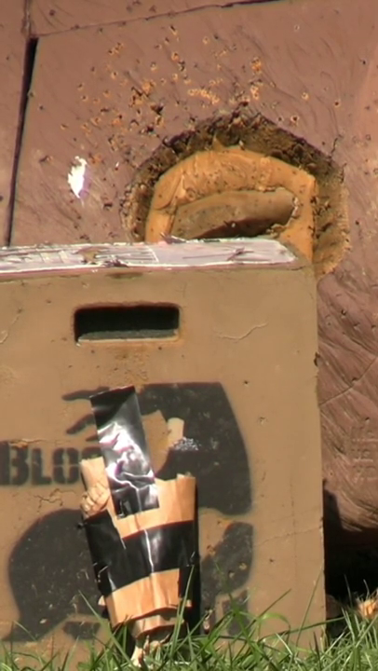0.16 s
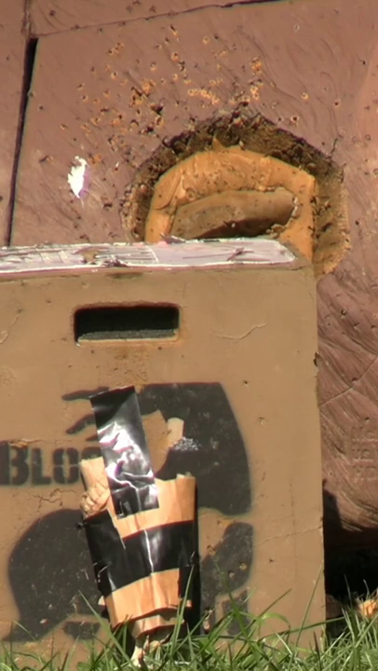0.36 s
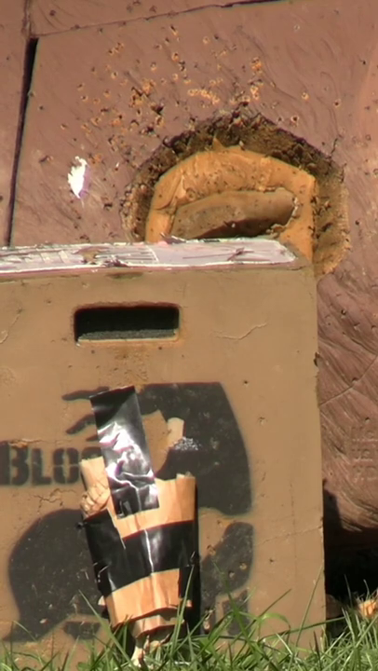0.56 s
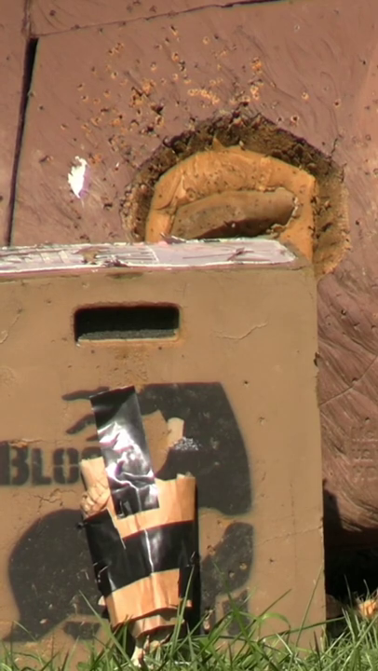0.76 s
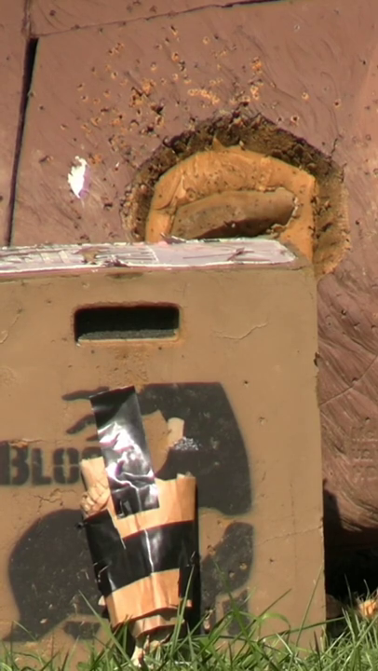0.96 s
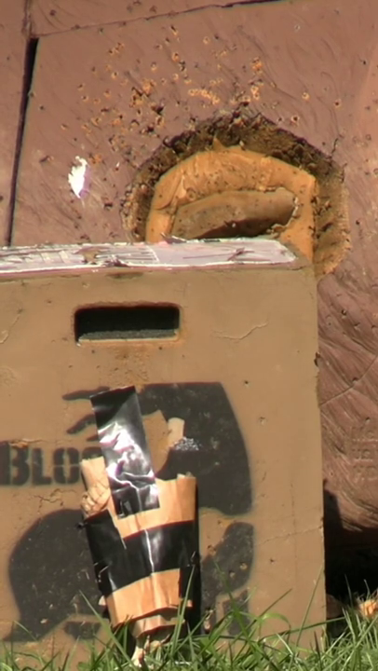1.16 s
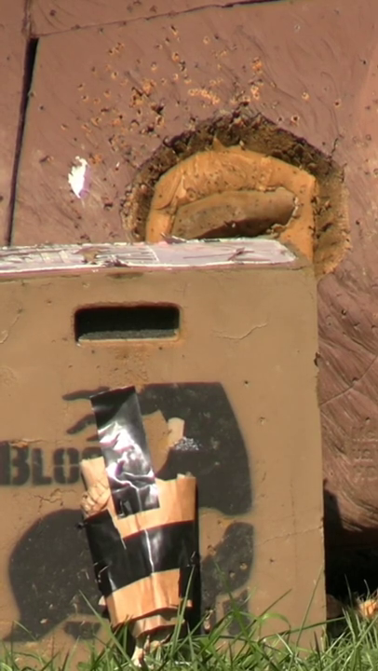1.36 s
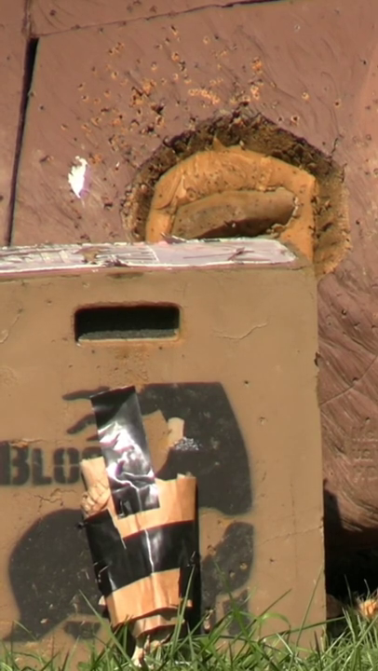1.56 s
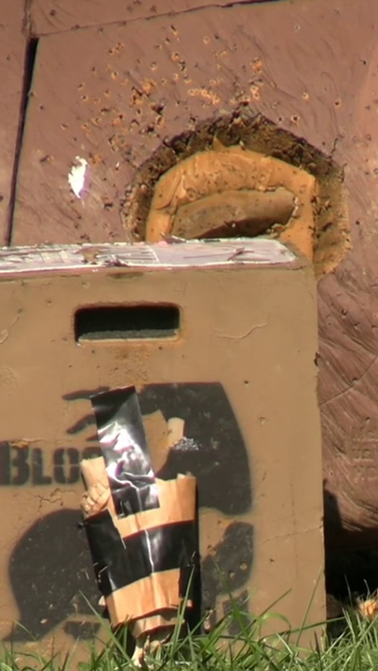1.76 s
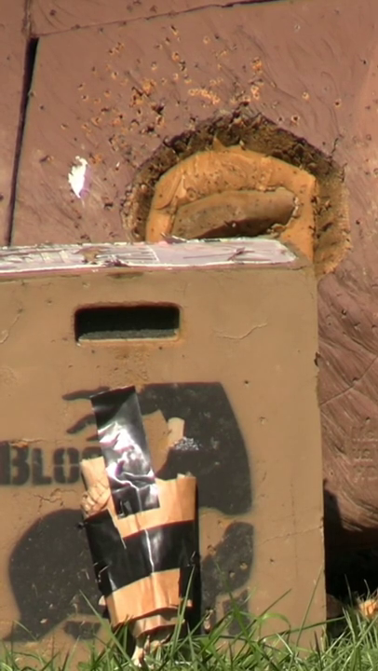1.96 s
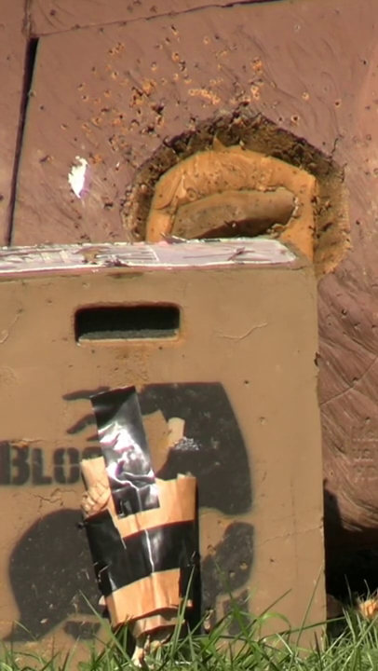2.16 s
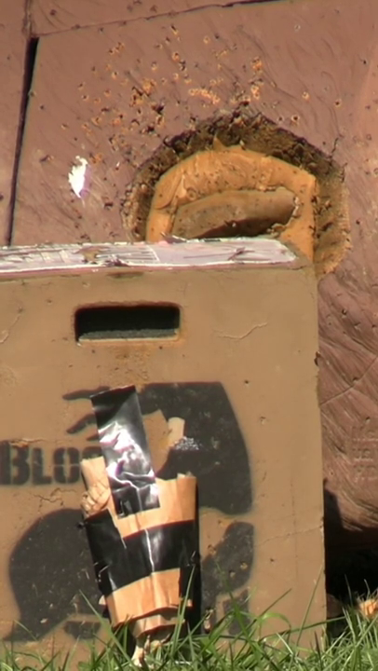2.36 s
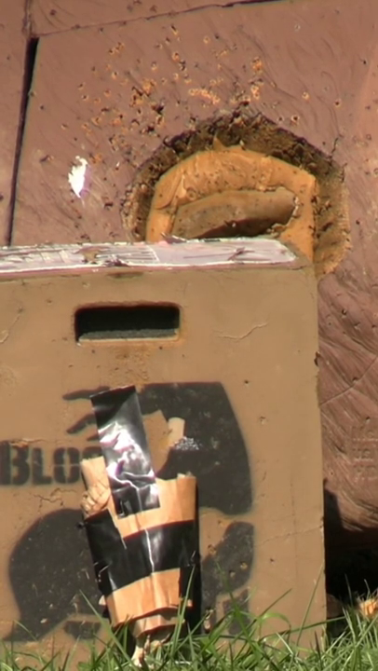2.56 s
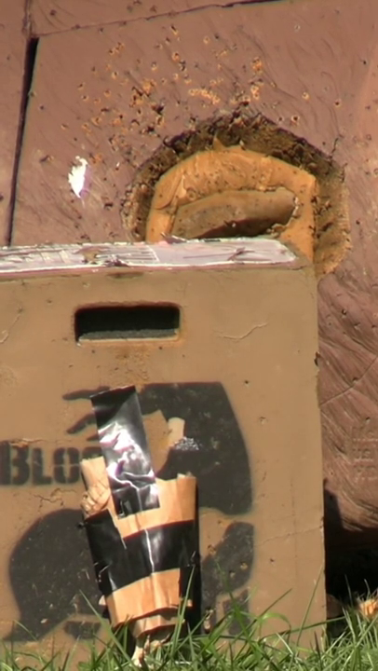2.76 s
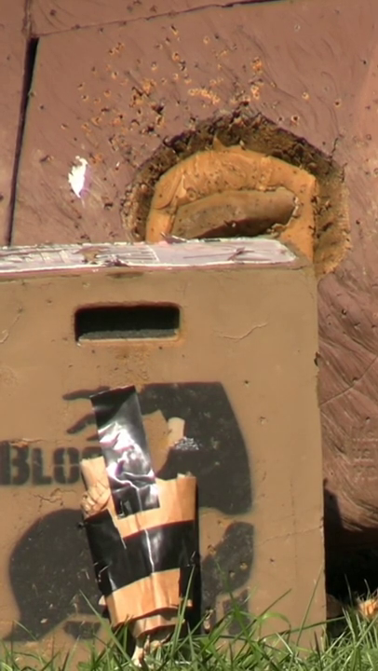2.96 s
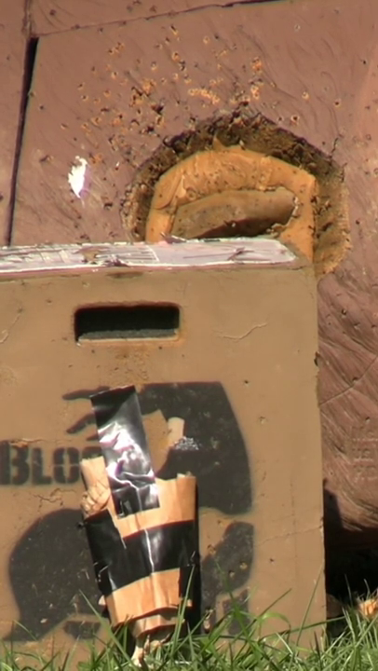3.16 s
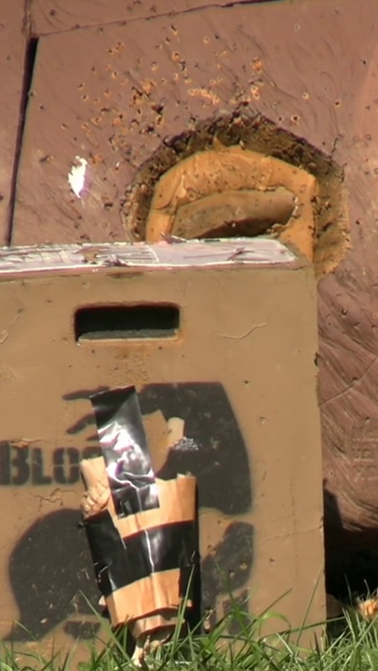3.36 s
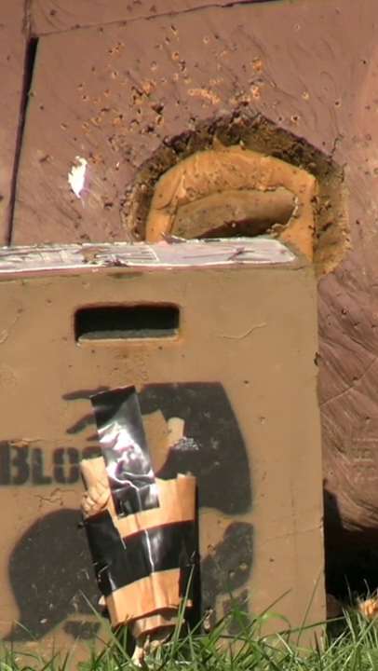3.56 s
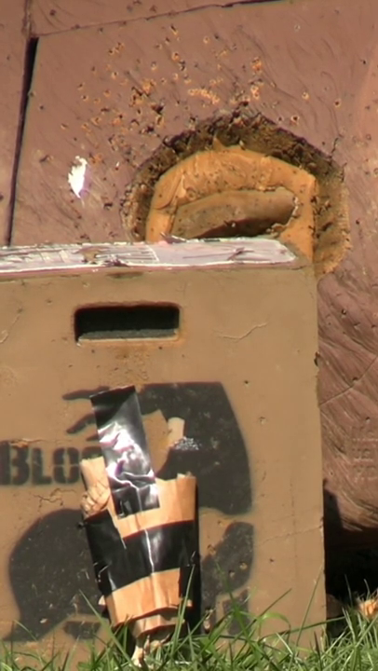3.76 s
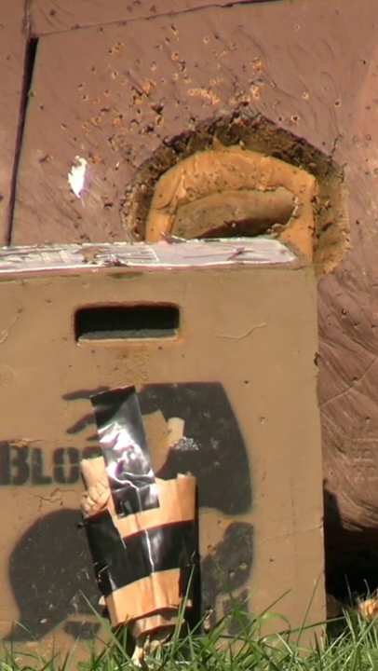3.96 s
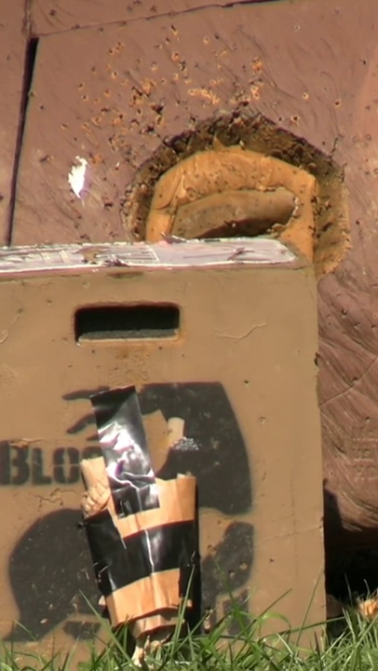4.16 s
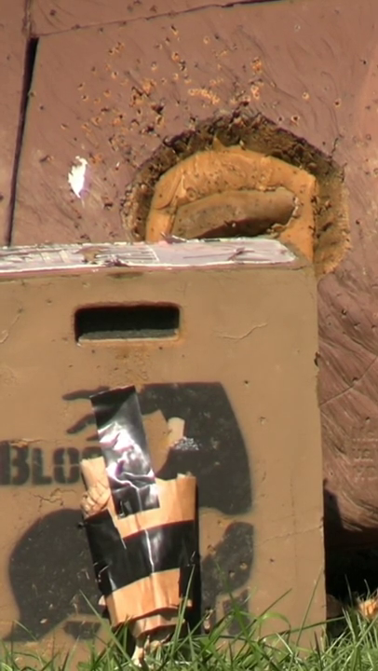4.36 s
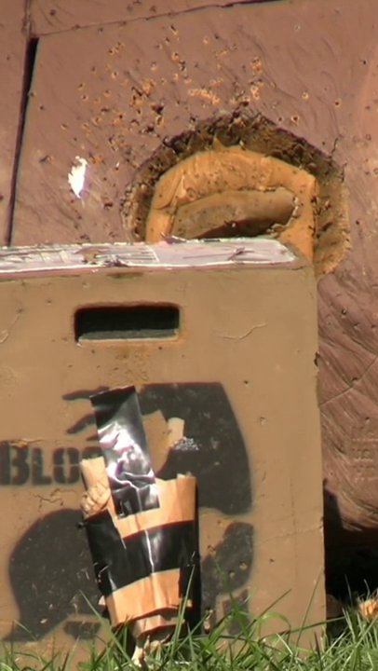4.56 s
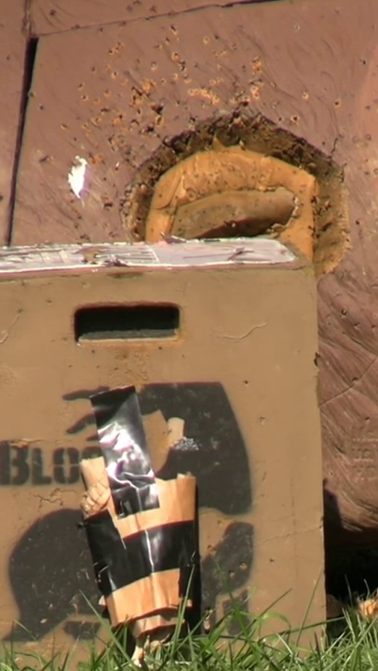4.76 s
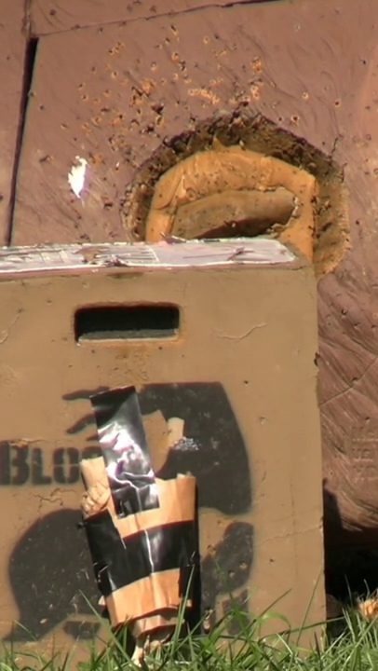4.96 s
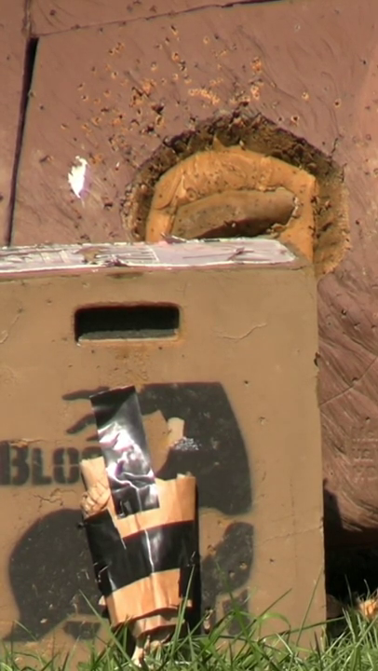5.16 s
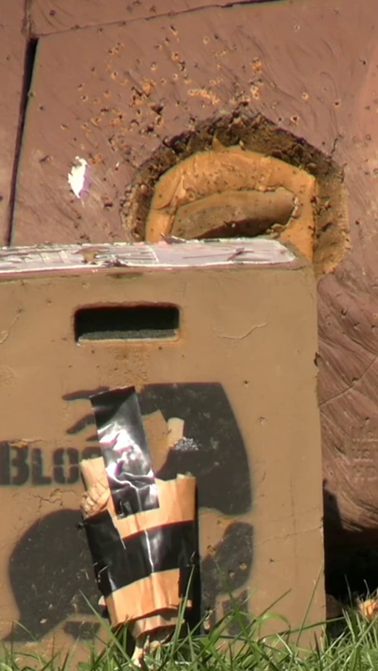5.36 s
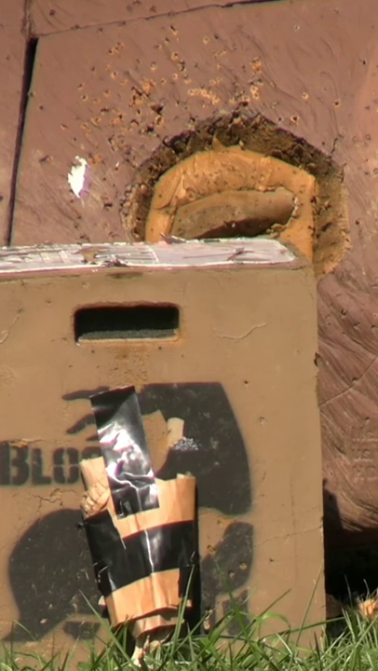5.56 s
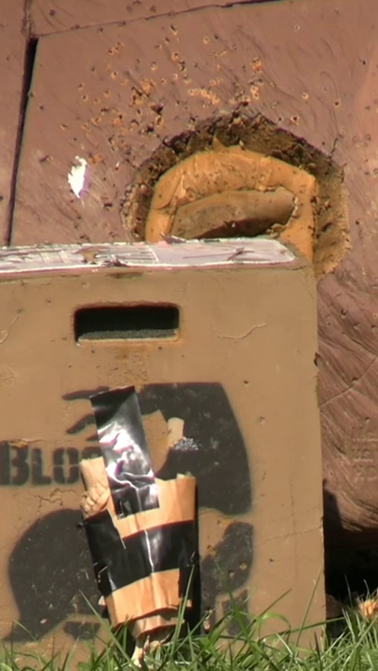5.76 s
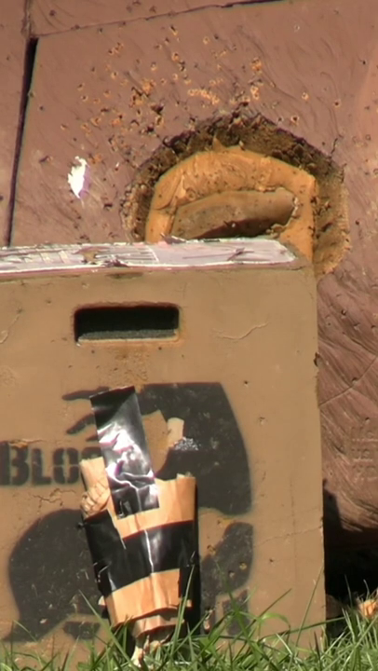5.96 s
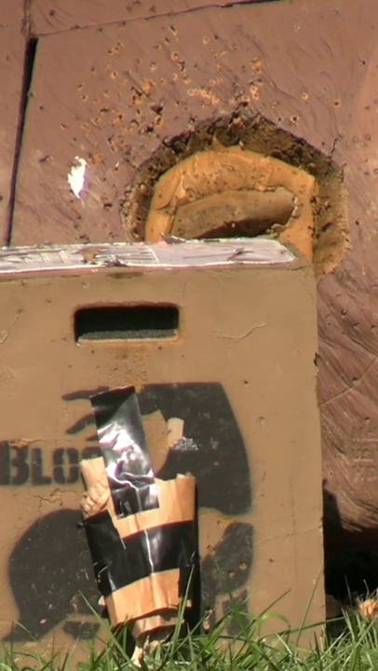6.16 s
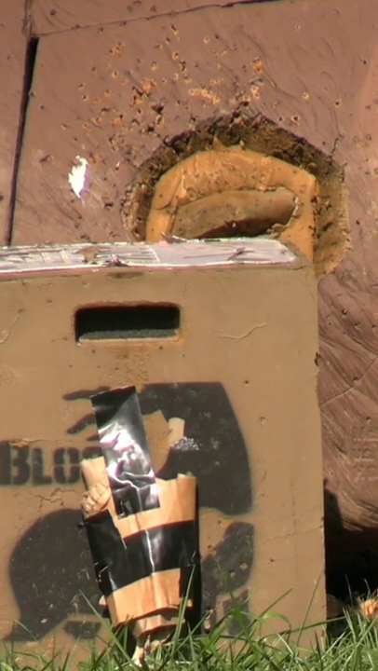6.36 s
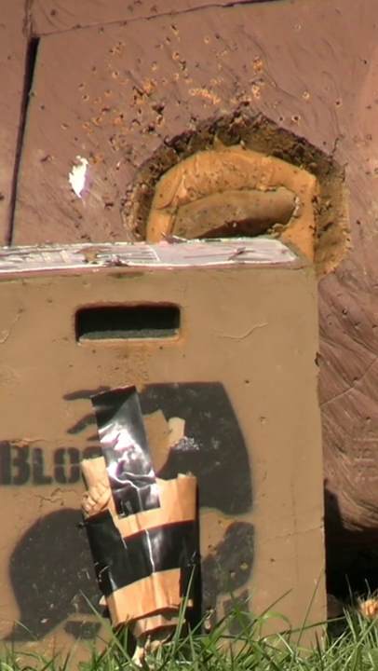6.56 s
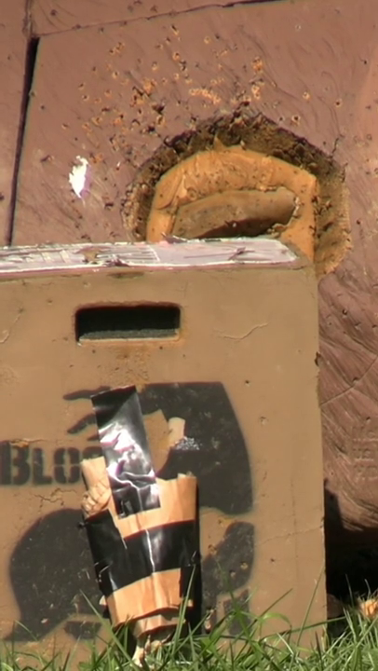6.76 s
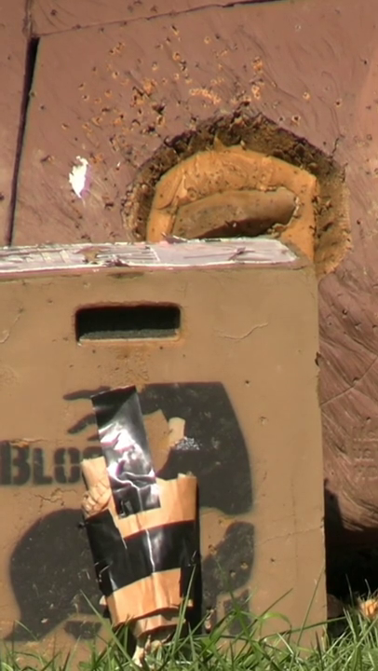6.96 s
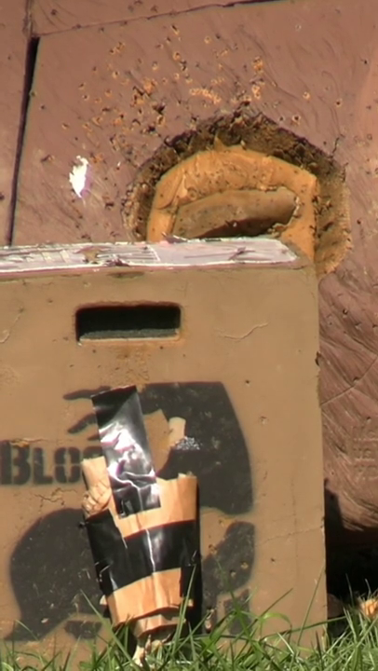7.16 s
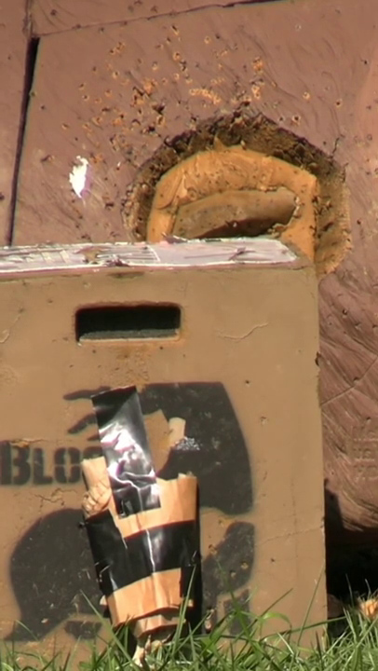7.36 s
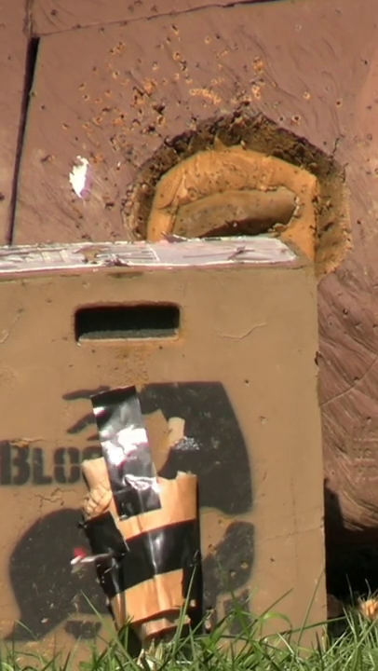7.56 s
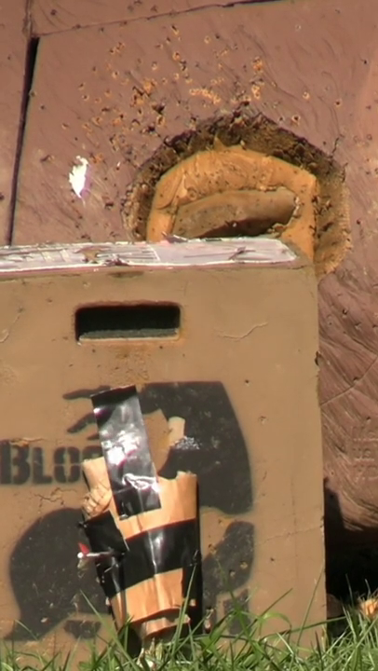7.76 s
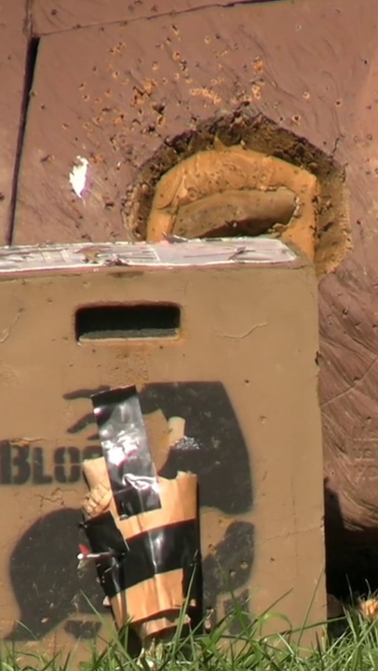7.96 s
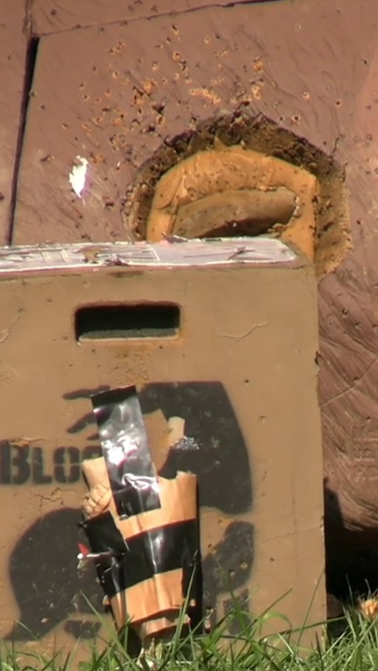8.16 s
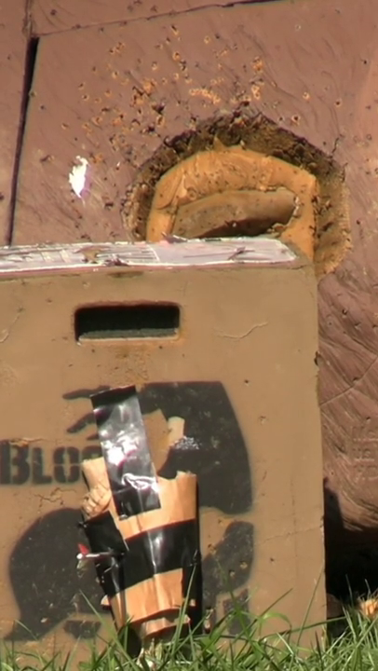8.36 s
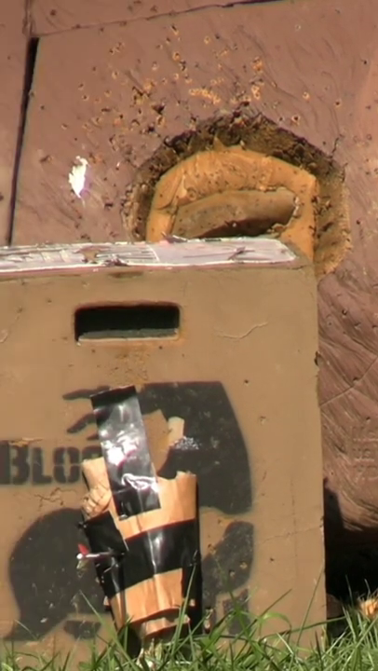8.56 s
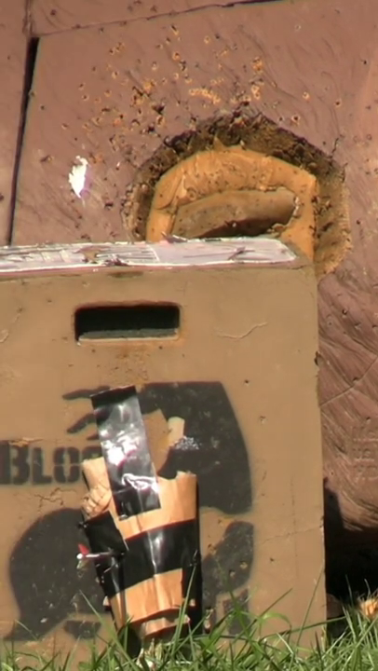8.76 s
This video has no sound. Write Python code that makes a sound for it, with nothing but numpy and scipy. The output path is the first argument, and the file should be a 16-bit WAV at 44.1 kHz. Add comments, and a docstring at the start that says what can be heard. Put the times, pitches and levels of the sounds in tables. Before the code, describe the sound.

After about seven seconds of quiet outdoor ambience, with buzzing cicadas, crickets, gliding bird notes, a distant crow and a faint engine drone, an archer shoots close by. The release clicks, the string slams and the bow rings briefly; almost at once the arrow hits a bone and foam target with a sharp crack and dull knock. Trees return a short echo and the insects carry on. Everything is in the left channel, and both impacts clip.

```python
"""An archer shoots in a summer garden: the release clicks, the bow slams and rings, and a quarter second
later the arrow cracks into a bone on a foam block and the trees echo. Around it a distant engine hums,
grass rustles, cicadas sizzle, and crickets and katydids pulse. A sparrow trills, a wren, a finch and a
far whistling bird sing gliding notes, and a far crow caws. One microphone feeds the left channel only
and overloads on both cracks."""
import sys
import numpy as np
from scipy import signal
from scipy.fft import rfft, irfft, next_fast_len
from scipy.io import wavfile

SR = 44100
rng = np.random.default_rng(int(sys.argv[2]) if len(sys.argv) > 2 else 0)


def digitize_waveform(pressure):
    """Quantize a signal to 16-bit integers and store it at the path in sys.argv[1].

    Rows of a 2-D input are taken as channels; values are limited to [-1, 1].
    """
    field = np.atleast_2d(pressure).T
    bounded = np.clip(field, -1, 1)
    quanta = np.round(bounded * 32767).astype(np.int16)
    wavfile.write(sys.argv[1], SR, quanta)


N = 392490
TIME_S = np.arange(N) / SR


def from_db(db):
    """Decibels to gain."""
    return 10 ** (np.asarray(db) / 20)


def unit_rms(x):
    """Scale to rms 1."""
    return x / np.sqrt(np.mean(x ** 2) + 1e-20)


def at_hz(rows, hz):
    """Interpolate each column of a spectrum over log frequency."""
    points_hz, *columns = np.transpose(rows)
    return [np.interp(np.log(np.maximum(hz, 1)), np.log(points_hz), c) for c in columns]


def coloured(x, spectrum):
    """Filter by a curve of f/Hz, gain/dB."""
    size = next_fast_len(len(x))
    gain_db, = at_hz(spectrum, np.arange(size // 2 + 1) * SR / size)
    return irfft(rfft(x, size) * from_db(gain_db), size)[:len(x)]


def low_cut(x, hz):
    """Second-order high-pass."""
    return signal.sosfilt(signal.butter(2, hz, "high", fs=SR, output="sos"), x)


def white(size):
    """Noise at 0 dB per Hz."""
    return rng.standard_normal(size) * np.sqrt(SR / 2)


def drift(rate_hz):
    """Random wander, rms 1."""
    knots = rng.standard_normal(N // 20)
    return unit_rms(np.interp(TIME_S * rate_hz, np.arange(len(knots)), knots))


def tone(hz):
    """Sine following a pitch curve."""
    return np.sin(2 * np.pi * np.cumsum(hz) / SR)


def held(db, start_s, end_s, rise_db_per_s, fall_db_per_s):
    """Rise, hold and fall, in dB."""
    early_s, late_s = np.maximum(start_s - TIME_S, 0), np.maximum(TIME_S - end_s, 0)
    return db - rise_db_per_s * early_s - fall_db_per_s * late_s


def add(out, start_s, sound):
    """Mix a sound in at start_s."""
    at = max(round(start_s * SR), 0)
    out[at:at + len(sound)] += sound[:N - at]


def struck(modes, rise_s):
    """Damped sines set ringing by one blow."""
    t = TIME_S[:SR]
    ring = sum(from_db(db - 60 * t / t60_s) * np.sin(2 * np.pi * hz * t) for hz, db, t60_s in modes)
    return ring * (1 - np.exp(-t / rise_s))


def dying_noise(bands, rise_s):
    """One second of diffuse sound that swells, then decays band by band."""
    t, out = TIME_S[:SR], 0
    edges_hz = np.geomspace(70, 17000, 21)
    for low_hz, high_hz in zip(edges_hz, edges_hz[1:]):
        level_db, t60_s = at_hz(bands, np.sqrt(low_hz * high_hz))
        bandpass = signal.butter(3, [low_hz, high_hz], "band", fs=SR, output="sos")
        out = out + signal.sosfilt(bandpass, white(SR)) * from_db(level_db - 60 * t / t60_s)
    return out * (1 - np.exp(-(t / rise_s) ** 2))


# garden reverb: f/Hz, relative level/dB, t60/s
GARDEN_REVERB = [(500, -43, 0.47), (2000, -41.5, 0.92), (6000, -46, 0.77), (13000, -53, .4)]
def garden(x, wet_db):
    """A sound plus its scatter from the trees."""
    response = dying_noise(GARDEN_REVERB, rise_s=0.035)
    return x + from_db(wet_db) * signal.fftconvolve(x, response / np.linalg.norm(response))[:N]


# air noise: f/Hz, density/(dB per Hz)
AIR_SPECTRUM = [(25, -89), (50, -82.5), (75, -76), (125, -77.5), (165, -87), (280, -95.5), (340, -91.5),
                (410, -95), (650, -97.5), (1150, -101), (1600, -101), (2400, -110), (4100, -111),
                (10000, -119), (12600, -115), (15500, -117)]
def air():
    """Steady outdoor noise, mostly bass."""
    return coloured(white(N), AIR_SPECTRUM)


# swells: peak t/s, half-width/s, gain/dB
GRASS_SWELLS = [(0, .3, -1), (1.05, .3, -5), (1.83, .18, 0), (8.75, .3, 3)]
# rustle at unit gain: f/Hz, density/(dB per Hz)
GRASS_SPECTRUM = [(100, -106.5), (700, -94), (1600, -99), (2600, -107), (5000, -110), (10000, -119),
                  (15500, -120)]
def grass(rest_db=-12):
    """Grass stirs faintly in bell-shaped swells."""
    swells = [from_db(db) * np.exp(-((TIME_S - s) / width_s) ** 2 / 2) for s, width_s, db in GRASS_SWELLS]
    power = from_db(rest_db) ** 2 + sum(swell ** 2 for swell in swells)
    return np.sqrt(power) * coloured(white(N), GRASS_SPECTRUM)


# firing tone: t/s, level/dB
ENGINE_LEVEL = [(0, -53), (.5, -50), (2.2, -52.5), (2.9, -56), (4.6, -57.5), (7.6, -57), (8.1, -52.5),
                (8.9, -54.5)]
def engine(firing_hz=100.5, wander_hz=.7, waver_db=1.0, whine_hz=1593, whine_db=-80):
    """Only the firing tone and a thin whine carry this far, wavering in the air."""
    level_db = np.interp(TIME_S, *np.transpose(ENGINE_LEVEL))
    firing = np.sqrt(2) * tone(firing_hz + wander_hz * drift(13))
    whine = from_db(whine_db + 3 * drift(6)) * tone(whine_hz + 4 * drift(20))
    return from_db(level_db + waver_db * drift(14)) * firing + whine


# chorus: f/Hz, relative level/dB
CICADA_SPECTRUM = [(3900, -125), (4700, -104), (5250, -102), (5600, -87.5), (6000, -83.5), (6250, -84.5),
                   (6430, -80), (6750, -86), (7400, -83), (7950, -89), (8450, -93.5), (8900, -109),
                   (9800, -128), (15000, -150)]
def cicadas(level_db=-50.4, flutter_db=0.39, swell_db=.4):
    """Many cicadas merge into a fluttering sizzle."""
    sizzle = unit_rms(coloured(white(N), CICADA_SPECTRUM))
    return sizzle * from_db(level_db + flutter_db * drift(160) + swell_db * drift(14))


def trill(rate_hz, hz, sag_hz, duty, db, scatter_hz=15):
    """A train of tone pulses, each sagging in pitch."""
    cycle = np.cumsum(rate_hz * (1 + .003 * drift(3.5))) / SR % 1
    progress = np.minimum(cycle / duty, 1)
    pitch_hz = hz + sag_hz * (.5 - progress) + scatter_hz * drift(250)
    return from_db(db + 0.45 * drift(20)) * np.sin(np.pi * progress) * tone(pitch_hz)


# wing strokes: rate/Hz, f/Hz, sag/Hz, duty/1, level/dB (NEAR_KATYDID: no level)
CRICKETS = [(45.05, 3480, 240, .8, -62), (41.0, 3140, 120, .95, -75.5)]
NEAR_KATYDID = (19.75, 8630, 150, .32)
FAR_KATYDID = (3.2, 8380, 60, .35, -64.5)
def crickets_and_katydids():
    """Stridulation: each stroke's tone sags as it slows. Far crickets blur into a band of noise."""
    crickets = sum(trill(*row) for row in CRICKETS)
    near_db = held(-57.5, start_s=4.4, end_s=8.25, rise_db_per_s=10, fall_db_per_s=25)
    katydids = trill(*NEAR_KATYDID, near_db) + trill(*FAR_KATYDID, scatter_hz=130)
    blur = coloured(white(N), [(2700, -125), (3100, -103), (3450, -100), (3800, -125), (9000, -160)])
    return blur + garden(crickets + katydids, wet_db=-11)


# trill notes: rate/Hz, f/Hz, sag/Hz, duty/1
SPARROW_TRILL = (57, 4850, 750, .75)
def sparrow():
    """A fast trill holds briefly, then fades."""
    return trill(*SPARROW_TRILL, held(-62, start_s=0, end_s=.18, rise_db_per_s=0, fall_db_per_s=95))


# contacts: t/s, level/dB, f/Hz, t60/s
TICKS = [(1.111, -48.5, 190, 0.11), (2.115, -62, 10000, .02), (3.035, -67, 11000, .09),
         (5.215, -58.5, 3050, 0.075), (7.386, -36.5, 1200, 0.066), (7.391, -41, 4200, 0.038)]
def ticks():
    """Small knocks and ticks near the archer, each a decaying band of noise."""
    out, t = np.zeros(N), TIME_S[:SR // 2]
    for s, db, hz, t60_s in TICKS:
        band = [(hz / 2, -20), (hz, 0), (hz * 2, -20), (hz * 10, -60)]
        add(out, s, unit_rms(coloured(white(len(t)), band)) * from_db(db - 60 * t / t60_s))
    return out


def repeated(bouts, period_s, growth_db_per_s):
    """Evenly paced phrases within each bout: t/s, level/dB."""
    return [(s + t, db + growth_db_per_s * t)
            for s, length_s, db in bouts for t in np.arange(0, length_s, period_s)]


def song(phrases, notes):
    """Gliding bird notes, pure or raspy, never quite alike."""
    out, tremble = np.zeros(N), drift(900)
    for s, db in phrases:
        for delay_s, length_s, start_hz, middle_hz, end_hz, note_db, rasp_hz in notes:
            progress = np.linspace(0, 1, int(length_s * SR))
            parabola = np.polyfit([0, .5, 1], [start_hz, middle_hz, end_hz], 2)
            glide_hz = np.polyval(parabola, progress) * rng.normal(1, 0.014)
            jitter_hz = rasp_hz * tremble[int((s + delay_s) * SR):][:len(progress)]
            envelope = from_db(db + note_db + rng.normal(0, 1)) * np.sin(np.pi * progress)
            add(out, s + delay_s, envelope * np.sqrt(2) * tone(glide_hz + jitter_hz))
    return out


# bouts: t/s, length/s, level/dB
WREN_BOUTS = [(1.345, 1.3, -61.5)]
# phrase: delay/s, length/s, start f/Hz, middle f/Hz, end f/Hz, gain/dB, rasp/Hz
WREN_NOTES = [(0, .026, 4210, 3050, 2230, -2, 520), (0.033, 0.032, 2400, 2300, 2260, -5.5, 50),
              (0.057, .052, 2880, 2630, 2570, -2, 55), (.143, .035, 2090, 2440, 2590, 2.5, 50.1)]
def wren():
    """One four-note phrase repeats, growing louder."""
    return song(repeated(WREN_BOUTS, period_s=.235, growth_db_per_s=2.5), WREN_NOTES)


# runs: t/s, length/s, level/dB
FINCH_RUNS = [(1.68, .06, -68), (3.225, .18, -67.5), (6.49, .66, -68)]
# chip: columns as WREN_NOTES
FINCH_NOTES = [(0, .046, 4450, 3950, 3400, 0, 110)]
def finch():
    """Falling chips in short runs that tail off."""
    return song(repeated(FINCH_RUNS, period_s=.119, growth_db_per_s=-10), FINCH_NOTES)


# calls: t/s, level/dB
WHISTLES = [(3.53, -77), (5.42, -67), (7.02, -77)]
# whistle: columns as WREN_NOTES
WHISTLE_NOTES = [(0, .12, 2700, 2660, 2590, 0, 25)]
def whistling_bird():
    """A far bird whistles single, slightly falling notes."""
    return song(WHISTLES, WHISTLE_NOTES)


# caws: t/s, length/s, level/dB
CAWS = [(3.897, 0.31, -65), (4.33, 0.35, -62.5), (4.928, .38, -61.5), (5.45, 0.3, -59.5), (6.03, .12, -67)]
# throat resonance: f/Hz, gain/dB
CROW_THROAT = [(700, -50), (1100, -5), (1270, -2.5), (1400, -4.5), (1560, -6), (1750, -17), (2100, -24),
               (3500, -64)]
def crow(pitch_hz=435, roughness=0.075):
    """Hoarse, uneven pulses through one throat resonance."""
    effort = np.zeros(N)
    for s, length_s, db in CAWS:
        arch = np.abs(np.sin(np.linspace(0, np.pi, int(length_s * SR))))
        add(effort, s, from_db(db) * np.sqrt(arch))
    cycles = np.cumsum(pitch_hz * (1 + roughness * drift(350) + .02 * drift(8))) / SR
    pulses = np.diff(np.floor(cycles), prepend=0) * from_db(4.5 * drift(200))
    return effort * unit_rms(coloured(pulses - pulses.mean(), CROW_THROAT))


STRING_STOP_S = 7.2775
# release, then string stop: t/s, level/dB, t60/s, chatter gap/s, step per contact/dB
BOW_BLOWS = [(7.2519, -23.5, .013, .0016, -3.5), (7.277, -13, .017, .0024, .5)]
def bow_contacts(count=3, swing_s=.0265, rattle_db=-31, loss_db=4.5, rattle_t60_s=.014,
                 buzz_db=-24, buzz_t60_s=.08):
    """Force envelope: each blow chatters; loose fittings buzz, then rattle on each swing of the limbs."""
    chatter = [(s + k * gap_s, db + k * step_db, t60_s)
               for s, db, t60_s, gap_s, step_db in BOW_BLOWS for k in range(count)]
    buzz = [(STRING_STOP_S, buzz_db, buzz_t60_s)]
    rattle = [(STRING_STOP_S + (k + 1) * swing_s, rattle_db - k * loss_db, rattle_t60_s)
              for k in range(count)]
    force = np.zeros(N)
    for s, db, t60_s in chatter + buzz + rattle:
        add(force, s, from_db(db - 60 * TIME_S[:SR] / t60_s))
    return force


# contact noise: f/Hz, gain/dB
SNAP_SPECTRUM = [(150, 7), (600, 3.5), (1400, 3), (2500, 3.5), (4000, 1.3), (5200, 0.5), (6800, 0.8),
                 (10500, -4.8), (13000, 0.3), (15500, -1)]
# limb, riser and string modes: f/Hz, level/dB, t60/s
BOW_MODES = [(87, -37, .16), (200, -18.5, .045), (250, -12.5, 0.057), (293.6, -28.5, .22),
             (324, -28.5, 0.2), (435, -26, .15), (530, -33, 0.22), (606, -30, .2), (653, -27, .33),
             (675, -32, .26), (704, -13.5, 0.053), (890, -18, .04), (1005, -31, 0.13), (1231, -25.5, 0.11),
             (1310, -22, 0.084), (1491, -35, .17), (2395, -24, .095), (2627, -28, .05), (2810, -30, 0.064),
             (4105, -33, .05), (5686, -30, .07), (12600, -32, .06)]
# shudder: f/Hz, density/(dB per Hz), t60/s
BOW_SHUDDER = [(90, -78, .3), (220, -63.5, 0.4), (450, -63.5, 0.38), (750, -67, 0.4), (900, -76, .4),
               (1200, -72, 0.41), (2500, -73.5, 0.38), (4970, -76, 0.43), (9000, -80, 0.36),
               (15500, -85.5, 0.3)]
def bow(rush_db=-27, rush_s=0.0018, whip_db=-42, whip_s=0.024):
    """The release clicks, the string rushes forward and stops hard; parts rattle and the limbs ring."""
    release_s = BOW_BLOWS[0][0]
    travelling = (TIME_S > release_s) & (TIME_S < STRING_STOP_S)
    to_stop_s = np.abs(TIME_S - STRING_STOP_S)
    rush = from_db(rush_db) * np.exp(-to_stop_s / rush_s)
    whip = from_db(whip_db) * np.exp(-to_stop_s / whip_s)
    force = bow_contacts() + travelling * (rush + whip)
    out = low_cut(force * unit_rms(coloured(white(N), SNAP_SPECTRUM)) + 1e-18, hz=450)
    add(out, STRING_STOP_S, struck(BOW_MODES, rise_s=0.00093) + dying_noise(BOW_SHUDDER, rise_s=.004))
    return garden(low_cut(out, hz=60), wet_db=-25)


# bone and foam block modes: f/Hz, level/dB, t60/s
TARGET_MODES = [(190, -22, 0.055), (624, -6.5, 0.019), (809, 4.5, 0.0093), (1042, -6, 0.012),
                (1380, -15, 0.016), (2100, -23, .014), (2840, -21, 0.018), (3170, -23, .015),
                (3840, -21, 0.014), (5750, -17.5, 0.01)]
# scatter from the trees: f/Hz, density/(dB per Hz), t60/s
TREE_ECHO = [(150, -77, 0.54), (400, -82, 0.53), (588, -65.5, 0.8), (910, -65.5, 0.84), (1400, -64, 0.8),
             (2200, -72, 0.7), (3220, -71, 0.6), (6510, -77.5, 0.57), (10000, -90.5, .4),
             (15500, -102, 0.5)]
# reflections off the ground and things behind the block: delay/s, gain/dB
NEAR_ECHOES = [(.0046, -22), (.0092, -28), (.0128, -29)]
def arrow_hit(hit_s=7.5422, crack_db=-11, crack_s=0.00099, splinter_db=-37, splinter_s=.01):
    """The point cracks the bone, the block gives one dead knock, and the trees throw it back."""
    out, t = np.zeros(N), TIME_S[:SR]
    fracture = from_db(crack_db) * np.exp(-t / crack_s) + from_db(splinter_db) * np.exp(-t / splinter_s)
    crack_spectrum = [(300, -23), (1200, -2), (3000, 2), (9000, -4), (15500, -16)]
    crack = fracture * unit_rms(coloured(white(SR), crack_spectrum))
    knock = low_cut(struck(TARGET_MODES, rise_s=0.00054), hz=175)
    add(out, hit_s, knock + crack + dying_noise(TREE_ECHO, rise_s=0.018))
    for delay_s, db in NEAR_ECHOES:
        add(out, hit_s + delay_s, from_db(db) * knock)
    return out


def scene():
    """All sources at one microphone, left channel only."""
    background = air() + grass()
    near_birds = garden(sparrow() + wren(), wet_db=-10.5) + garden(finch(), wet_db=-6)
    far_birds = from_db(-1.5) * garden(crow() + whistling_bird(), wet_db=-5.5)
    archery = bow() + arrow_hit() + ticks()
    insects = cicadas() + crickets_and_katydids()
    left = archery + insects + near_birds + far_birds + engine() + background
    return np.array([left, np.zeros(N)])


def record(dry, gain_db=6, threshold_db=-7, release_db_per_s=13, attack_s=0.034, max_duck_db=4,
           ceiling=.93, cutoff_hz=15800):
    """Gain control ducks after the cracks but is too slow for their peaks, which clip; the top is cut."""
    x = dry * from_db(gain_db)
    over_db = np.clip(20 * np.log10(np.abs(x[0]) + 1e-9) - threshold_db, 0, max_duck_db)
    release_db = release_db_per_s * TIME_S
    held_db = np.maximum.accumulate(over_db + release_db) - release_db
    pole = np.exp(-1 / (attack_s * SR))
    duck_db = signal.lfilter([1 - pole], [1, -pole], held_db)
    clipped = np.clip(x * from_db(-duck_db), -ceiling, ceiling)
    return signal.sosfilt(signal.ellip(10, .1, 80, cutoff_hz, fs=SR, output="sos"), clipped)


dry = scene()
out = record(dry)
digitize_waveform(out)
```